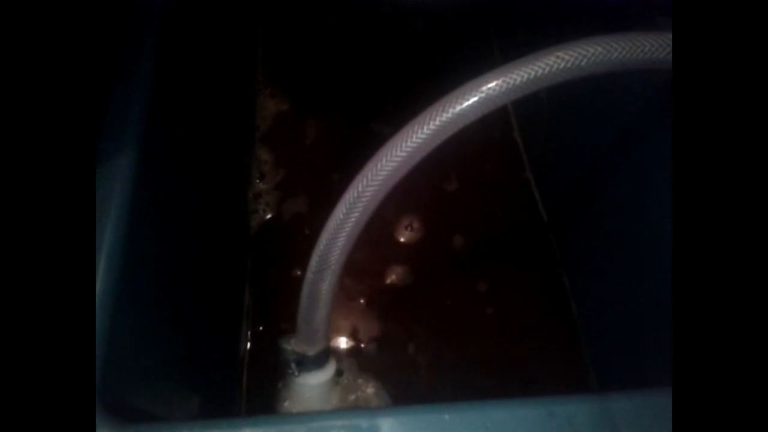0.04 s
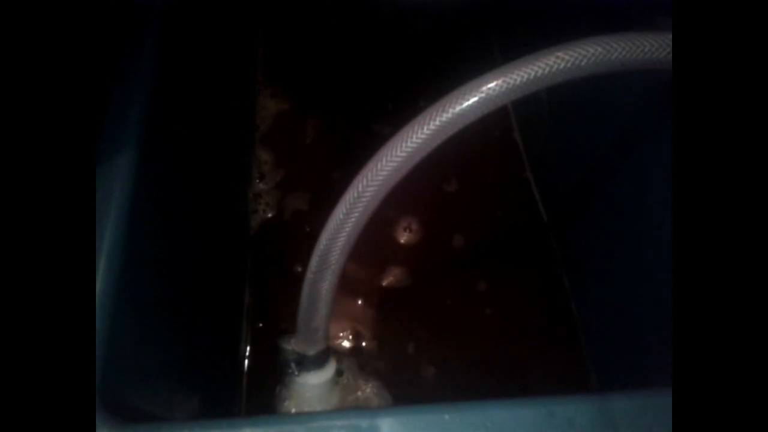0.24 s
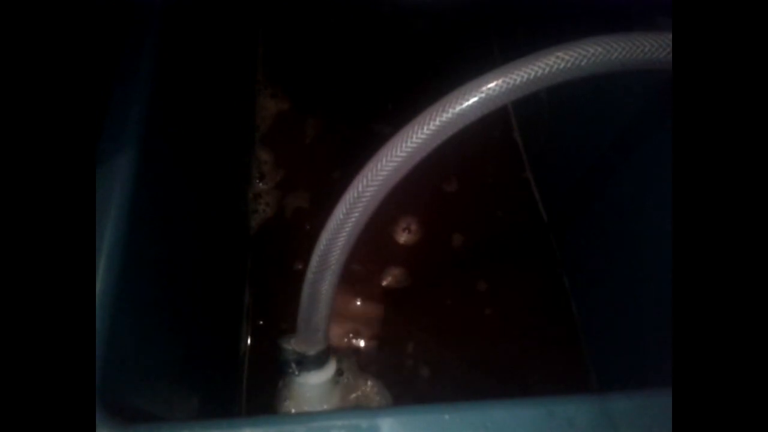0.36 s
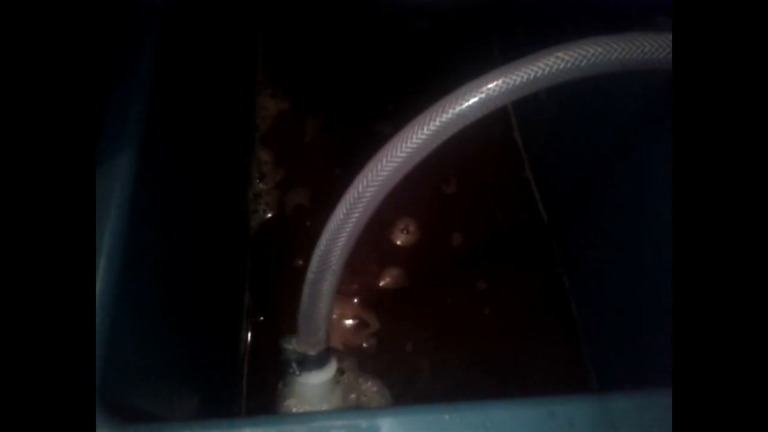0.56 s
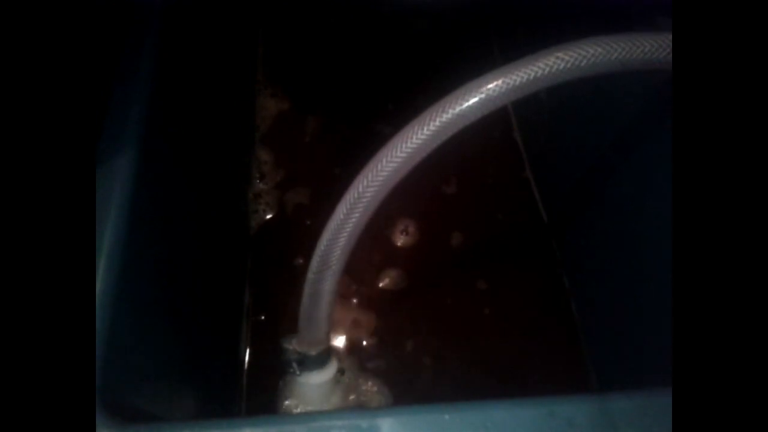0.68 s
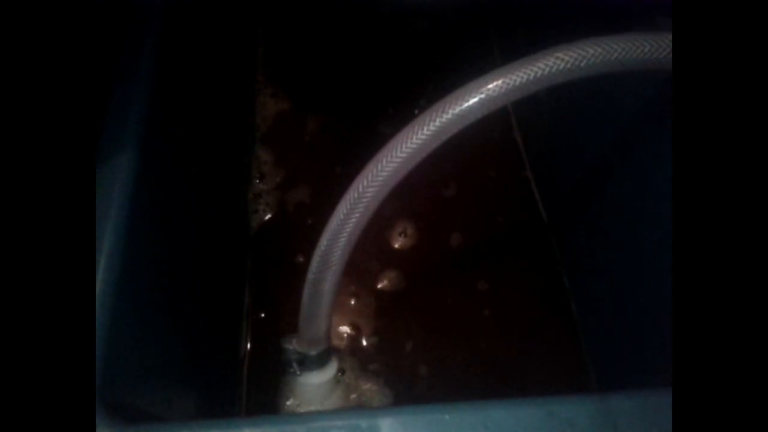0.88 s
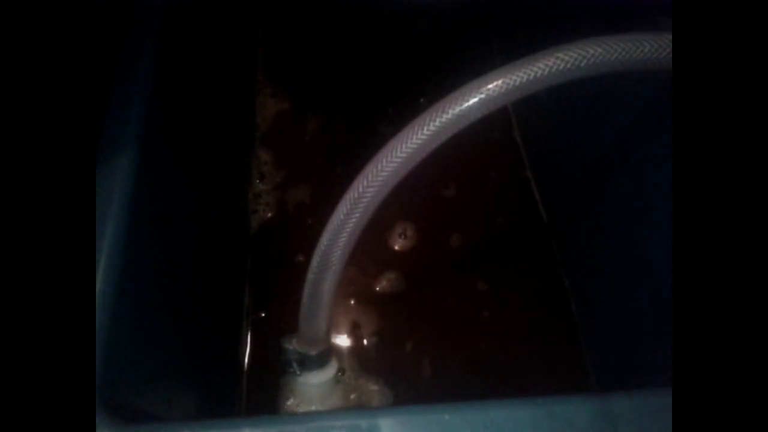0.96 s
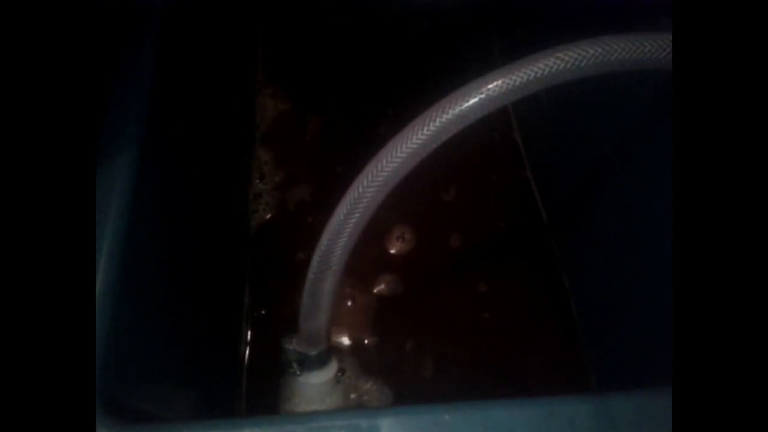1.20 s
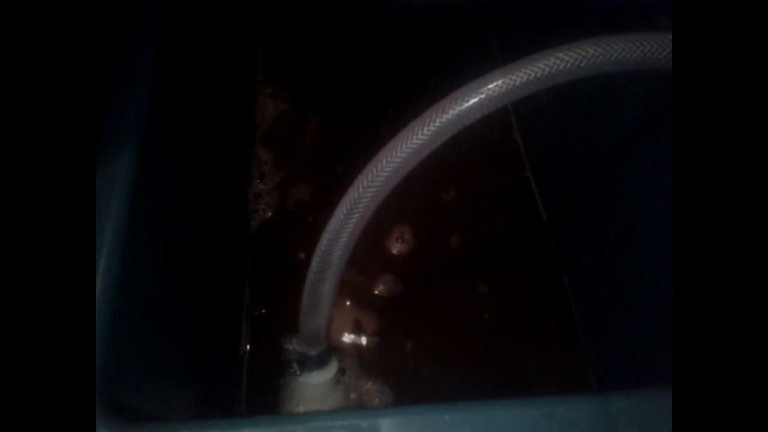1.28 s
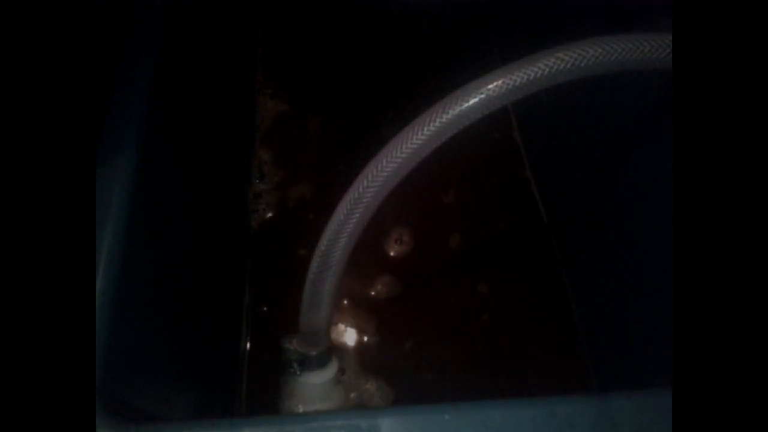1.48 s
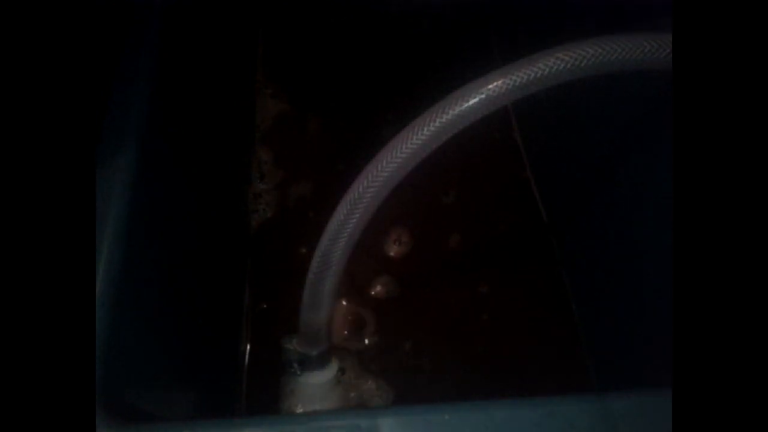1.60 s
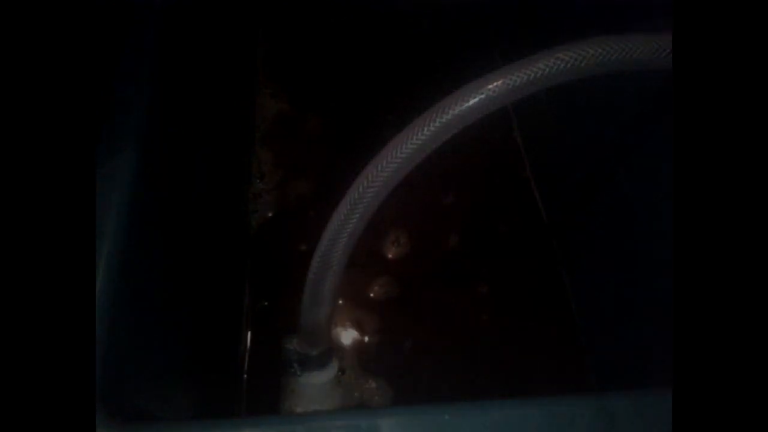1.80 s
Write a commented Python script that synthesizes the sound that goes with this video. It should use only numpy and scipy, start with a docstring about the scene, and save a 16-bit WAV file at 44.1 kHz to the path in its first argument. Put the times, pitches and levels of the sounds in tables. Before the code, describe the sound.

Liquid drips irregularly into a shallow pool in a plastic bin, close to the microphone. Drops tick and small bubbles plink, with one sharper drop midway, then a brief fizz and soft bumps, over faint cellar hiss and hum.

```python
"""Drips in a plastic bin

Liquid drips and gurgles into a shallow pool at the bottom of a bin, close to the microphone.
Drops tick on the surface, trapped bubbles ring and bend in pitch, froth fizzes in short spells
and the bin is bumped softly. Its walls answer quickly; behind lie a cellar, faint mains hum and hiss."""
import sys
import numpy as np
from scipy import signal
from scipy.fft import rfft, irfft
from scipy.io import wavfile
from scipy.ndimage import uniform_filter1d

SR = 44100
rng = np.random.default_rng(int(sys.argv[2]) if len(sys.argv) > 2 else 0)


def put_to_file(sound):
    """Save the sound as 16-bit audio at rate SR, in the file named by the first command-line argument."""
    columns = np.atleast_2d(sound).T  # one column per channel
    safe = np.clip(columns, -1, 1)
    whole_steps = np.round(safe * 32767)
    wavfile.write(sys.argv[1], SR, whole_steps.astype(np.int16))


N = 81585
T, HZ = np.arange(N) / SR, np.fft.rfftfreq(N, 1 / SR)

# Tone of the room hiss: f/Hz, relative level/dB
HISS_EQ = [(15, -51), (25, 18), (133, -2.5), (255, -9), (582, -9.5), (1010, -16), (1140, -17), (1430, -18),
           (1980, -16), (2670, -19), (5800, -23.5), (8230, -17.5), (9800, -36.5), (12700, -52),
           (21600, -120)]
# Partials of the hum: f/Hz, level/dB
HUM_TONES = [(99.15, -66), (401.4, -74), (276.7, -81)]
# Reverb time of the cellar: f/Hz, T60/s
CELLAR_DECAY = [(200, 0.3), (900, 0.4), (2100, 0.37), (4000, 0.42), (9000, 0.36)]
# Tone of the cellar reverb: f/Hz, relative level/dB
CELLAR_EQ = [(200, 3.5), (850, -0.5), (2000, -5), (3400, -5), (5000, -3.5), (9000, -2.5)]
# Microphone response: f/Hz, gain/dB
MIC_EQ = [(20, -3), (8000, 2.5), (8700, 1.5), (9300, -6.5), (10000, -12)]
# Resonances of the bin: f/Hz, relative level/dB, T60/s
BODY_MODES = [(77.4, -14.5, 0.026), (128, -5, 0.18), (205, 1.5, 0.049), (254.5, 0, 0.071), (463, -6, 0.053),
              (632, -5, 0.04), (960, 2.5, 0.016), (1470, -14, 0.035)]
# Soft bumps against the bin: t/s, level/dB, tilt/(dB per octave), scuff cutoff/Hz
BIN_BUMPS = [(1.095, -48, -4.5, 800), (1.5737, -44.5, 0, 1500), (1.649, -44.5, -8.5, 1100),
             (1.703, -49, -2, 620)]
# Faint ring that lingers after the hardest drop: f/Hz, level/dB, T60/s
AFTER_RING = [(1840, -51, 0.22), (1975, -49, 0.45), (2250, -55.5, .3)]
# Tone of the froth: f/Hz, relative level/dB
FROTH_EQ = [(200, -17), (900, -0.5), (2000, -3), (3400, -2), (5500, 0), (7000, -4), (8400, -5.5),
            (10000, -13)]
# Spells of fizz: peak t/s, level/dB, rise/s, fall/s, tilt/(dB per octave)
FIZZ_SPELLS = [(0.011, -57.5, 0.037, 0.049, -1.5), (0.647, -55, 0.016, .035, -2),
               (.71, -59, .018, 0.03, -3), (1.121, -45, 0.02, 0.041, 5), (1.15, -51.5, 0.044, 0.12, -5),
               (1.63, -58, 0.025, 0.08, -5), (1.735, -58, 0.019, 0.03, 6.5)]
# Path of one large bubble welling up: t/s, f/Hz, level/dB
GULP_PATH = [(0.236, 853.7, -37.5), (0.2393, 793, -37), (.249, 771, -41), (0.259, 827, -37.5),
             (0.267, 963, -42), (0.273, 1162, -36.5), (0.282, 1215, -49), (0.293, 1372, -48.5),
             (0.302, 1530, -55.5), (.309, 1660, -56)]
# Drops striking the surface: t/s, level/dB, centre f/Hz, half-width/octaves
DROP_HITS = [(.065, -47.5, 7850, 0.34), (.081, -47.5, 6440, 0.94), (.2825, -50, 7050, 0.39),
             (.338, -48, 5930, 0.3), (.3997, -32, 6100, 0.69), (.443, -45, 4750, 0.21),
             (.455, -47, 7200, 0.22), (.4662, -40, 6850, 0.28), (.5725, -41, 7000, 0.26),
             (.6025, -40.5, 5500, 1.6), (.758, -53.5, 7500, 0.11), (.8145, -21, 5730, 1.19),
             (.9045, -41, 5620, 0.13), (.907, -41, 7500, 1.1), (1.0055, -28, 6780, 0.39),
             (1.062, -40, 7000, 0.23), (1.3252, -40, 6940, 0.47), (1.4595, -43.5, 7340, 0.39),
             (1.4836, -37, 7240, 0.56), (1.5018, -37, 4900, 1.4), (1.609, -45.5, 7970, 0.21),
             (1.635, -42.5, 5470, 0.42), (1.724, -44, 4900, 0.94), (1.751, -46, 8300, 0.22)]
# Bubbles ringing until they burst: t/s, f/Hz, level/dB, life/s, glide/octaves
BUBBLE_NOTES = [(.017, 5490, -47.5, 0.0097, 0.49), (.034, 3300, -44.5, 0.0051, -0.0025),
                (.078, 1163, -48.5, 0.032, 0.091), (.222, 5100, -48, 0.0054, -0.32),
                (.283, 6840, -36, 0.0019, -.05), (.285, 2600, -49, 0.0085, 0.16),
                (.296, 770, -44.5, 0.053, 0.246), (.396, 3260, -46, 0.0047, 0.7),
                (.4003, 2076, -32, 0.0088, .03), (.409, 2130, -40.5, 0.0086, .14),
                (.411, 1176, -52.5, 0.024, -0.23), (.438, 2620, -48.5, 0.0074, 0.42),
                (.4665, 1211, -45.5, 0.027, 0.83), (.579, 2640, -45.5, 0.0024, -0.33),
                (.603, 2810, -33, 0.0018, 0.13), (.606, 3720, -50, 0.0037, 0.29),
                (.645, 2342, -51.5, 0.025, 0.0087), (.657, 3810, -44, 0.0028, .03),
                (.7435, 1050, -49, 0.033, 0.083), (.8147, 1974, -25.5, 0.0045, -0.0069),
                (.815, 8580, -28, 0.0024, -0.13), (.819, 2030, -30, 0.0065, -0.18),
                (.9065, 8140, -26.5, 0.0018, .03), (1.006, 4950, -28.5, 0.0017, -0.005),
                (1.084, 5680, -36.5, 0.0045, 0.38), (1.0915, 6880, -28, 0.0018, 0.25),
                (1.127, 844, -39, 0.027, -0.019), (1.209, 916, -39, 0.036, 0.053),
                (1.283, 1690, -51, .008, 0.51), (1.3265, 1473, -40.5, 0.0064, 0.37),
                (1.331, 1905, -39, .005, 0.14), (1.468, 2585, -47, 0.0069, 0.99),
                (1.502, 1563, -40.5, 0.013, -0.28), (1.509, 8100, -34, 0.0023, 0.16),
                (1.539, 4930, -51.5, 0.0087, 0.2), (1.578, 1890, -58, 0.0098, 0.26),
                (1.603, 1900, -49.5, 0.0029, -0.093), (1.636, 6680, -43.5, 0.0033, 0.24),
                (1.768, 4860, -49, 0.0036, -0.23)]


def amp(db):
    """Decibels to gain."""
    return 10 ** (np.asarray(db) / 20)


def unit(x):
    """Scales to rms 1."""
    return x / np.sqrt(np.mean(x ** 2) + 1e-20)


def curve(points, hz):
    """Reads a table along a log-frequency axis."""
    f, value = np.transpose(points)
    return np.interp(np.log(hz + 1), np.log(f + 1), value)


def add(mix, s, sound):
    """Mixes a sound in at s seconds."""
    part = mix[max(round(s * SR), 0):][:len(sound)]
    part += sound[:len(part)]


def colour(x, db):
    """Applies an EQ curve and scales to rms 1."""
    return unit(irfft(rfft(x) * amp(db), N))


def octaves(hz):
    """Octaves above 1 kHz."""
    return np.log2((hz + 1) / 1000)


def ring(modes, t):
    """Struck resonances: a sum of dying sines."""
    return sum(amp(db - 60 * t / t60) * np.sin(2 * np.pi * hz * t) for hz, db, t60 in modes)


def hiss():
    """A steady bed of room noise, very slightly patchy above the bass, rolled off below 90 Hz."""
    hz, _, bands = signal.stft(rng.standard_normal(N), SR, nperseg=512)
    patches = uniform_filter1d(rng.standard_normal(bands.shape), size=7, axis=0)
    patches = unit(uniform_filter1d(patches, size=8, axis=1))
    patch_db = 0.1 * patches * np.minimum(hz / 2000, 1)[:, None]
    noise = signal.istft(bands * amp(patch_db), SR, nperseg=512)[1][:N]
    low_cut_db = -10 * np.log10(1 + (90 / (HZ + 1)) ** 4)
    return amp(-59.5) * colour(noise, curve(HISS_EQ, HZ) + low_cut_db)


def hum():
    """Faint mains hum; each partial wavers in level at rates below 8 Hz."""
    out = np.zeros(N)
    for hz, db in HUM_TONES:
        waver = unit(irfft(rfft(rng.standard_normal(N)) * (HZ < 8), N))
        tone = np.sqrt(2) * np.sin(2 * np.pi * (hz * T + rng.random()))
        out += amp(db) * (1 + 0.21 * waver) * tone
    return out


def cellar(sound):
    """Adds the cellar's reverb: dense echoes, each band dying at its own rate."""
    hz, t, bands = signal.stft(rng.choice([-1., 1.], SR // 2), SR, nperseg=128)
    db = curve(CELLAR_EQ, hz)[:, None] - 60 * t / curve(CELLAR_DECAY, hz)[:, None]
    tail = signal.istft(bands * amp(db), SR, nperseg=128)[1]
    tail[:SR // 500] = 0  # 2 ms pre-delay
    response = amp(-11.5) * tail / np.linalg.norm(tail)
    response[0] += 1  # direct sound
    return signal.fftconvolve(sound, response)[:N]


def walls(sound, t60=0.038, delay_s=0.001):
    """Adds a quick scatter of treble off the bin walls, different for every spot in the pool."""
    t = T[:SR // 12]
    scatter = rng.choice([-1., 1.], len(t)) * amp(-60 * t / t60) * (t > delay_s)
    low_cut = signal.butter(2, 2000, "high", fs=SR)
    response = amp(-0.5) * signal.lfilter(*low_cut, scatter / np.linalg.norm(scatter))
    response[0] += 1
    return signal.fftconvolve(sound, response)


def bump(db, tilt_db, scuff_hz, scuff_s=0.0097):
    """A dull knock rings the body of the bin, with a brief scuff on top."""
    t = T[:SR // 3]
    pivot_hz = BODY_MODES[1][0]
    modes = [(hz, level + tilt_db * octaves(hz / pivot_hz * 1000), t60) for hz, level, t60 in BODY_MODES]
    high_cut_db = -10 * np.log10(1 + (HZ / scuff_hz) ** 6)
    scuff = colour(rng.standard_normal(N), high_cut_db)[:len(t)]
    return amp(db) * (ring(modes, t) + amp(-7) * scuff * np.exp(-t / scuff_s))


def pops(per_s, spread_db):
    """Tiny bubbles bursting: random clicks of uneven size."""
    size = amp(spread_db * np.minimum(rng.exponential(1, N), 4))
    return rng.standard_normal(N) * size * (rng.random(N) < per_s / SR)


def froth():
    """Froth bursts in dense swells of fizz over a thin, constant prickle."""
    tone_db = curve(FROTH_EQ, HZ)
    out = amp(-70) * colour(pops(per_s=440, spread_db=1), tone_db)
    for s, db, rise, fall, tilt_db in FIZZ_SPELLS:
        swell = np.exp(-.5 * (np.minimum(T - s, 0) / rise) ** 2 - np.maximum(T - s, 0) / fall)
        fizz = colour(pops(per_s=6300, spread_db=2), tone_db + tilt_db * octaves(HZ))
        out += amp(db) * swell * fizz
    return out


def gulp():
    """One large bubble wells up; its note climbs as it nears the surface."""
    s, hz, db = np.transpose(GULP_PATH)
    envelope = amp(np.interp(T, s, db, left=-200, right=-200))
    return envelope * np.sin(2 * np.pi * np.cumsum(np.interp(T, s, hz)) / SR)


def bubble(hz, db, life, glide_octaves, fade_db=-11.5, wobble_per_khz=0.0071):
    """Trapped air rings, glides ever faster as it nears the surface and cuts off as it bursts."""
    t = T[:round(3 * life * SR) + 50]
    age, cycles = t / life, t * hz
    jitter = uniform_filter1d(rng.standard_normal(SR // 2), size=32)[:len(t)] * np.sqrt(32)
    wobble = wobble_per_khz * hz / 1000 * jitter
    settle = 0.098 * np.exp(-cycles / 1.23)  # a new bubble starts sharp
    glide = 2 ** (glide_octaves * np.minimum(age, 1.2) ** 1.63)
    pitch = hz * glide * (1 + settle + wobble)
    attack = 1 - np.exp(-(cycles / 0.47) ** 2)
    cutoff = 1 / (1 + age ** 21)
    return amp(db + fade_db * age) * attack * cutoff * np.sin(2 * np.pi * np.cumsum(pitch) / SR)


def drop(db, centre_hz, half_width, hard_decay_s=0.00081, hard_db=1.5):
    """A drop hits the pool: a short splat of band noise, longer and softer for gentle drops."""
    t = T[:2048]
    decay_s = hard_decay_s * amp(0.29 * (hard_db - db))
    envelope = np.exp(-t / decay_s) * (1 - np.exp(-t / (0.069 * decay_s)))
    noise = irfft(np.exp(2j * np.pi * rng.random(1025)))  # flat spectrum, random phase
    edges_hz = centre_hz * 2. ** (np.array([-1, 1]) * (half_width + .01))
    band = signal.butter(5, np.clip(edges_hz, 100, SR / 2 - 500), "band", fs=SR, output="sos")
    splat = signal.sosfilt(band, noise * envelope)
    return amp(db) * splat * np.sqrt(hard_decay_s * SR / 2) / np.linalg.norm(splat)


def scene():
    """The sounds of the bin, through cellar reverb and microphone EQ, over hiss and hum."""
    pool = np.zeros(N)
    add(pool, 0, walls(gulp()) + walls(froth()))
    for events, source in (DROP_HITS, drop), (BUBBLE_NOTES, bubble), (BIN_BUMPS, bump):
        for s, *settings in events:
            add(pool, s, walls(source(*settings)))
    add(pool, 0.815, ring(AFTER_RING, T))  # on the hardest drop
    heard = irfft(rfft(cellar(pool)) * amp(curve(MIC_EQ, HZ)), N)
    return (heard + hiss() + hum())[None]


def record(dry):
    """A steep high cut at 9850 Hz takes off the air."""
    high_cut = signal.firwin(255, 9850, window=("kaiser", 7), fs=SR)
    return signal.oaconvolve(dry, high_cut[None], "same")


dry = scene()
out = record(dry)
put_to_file(out)
```